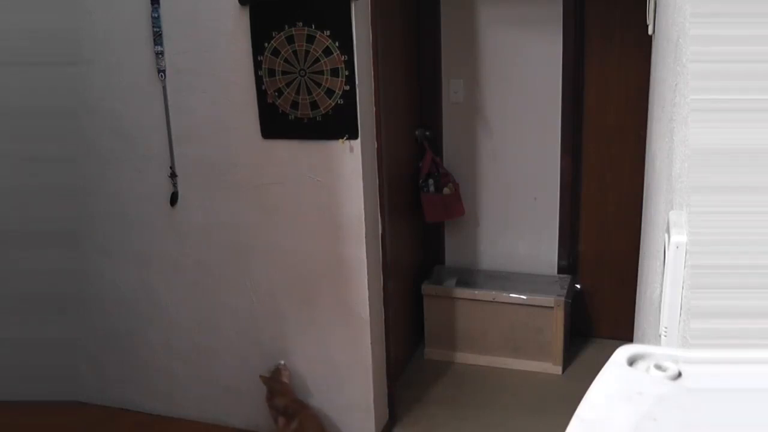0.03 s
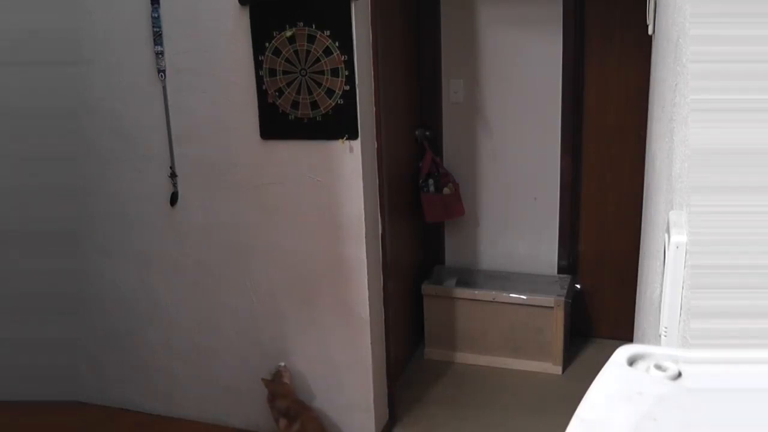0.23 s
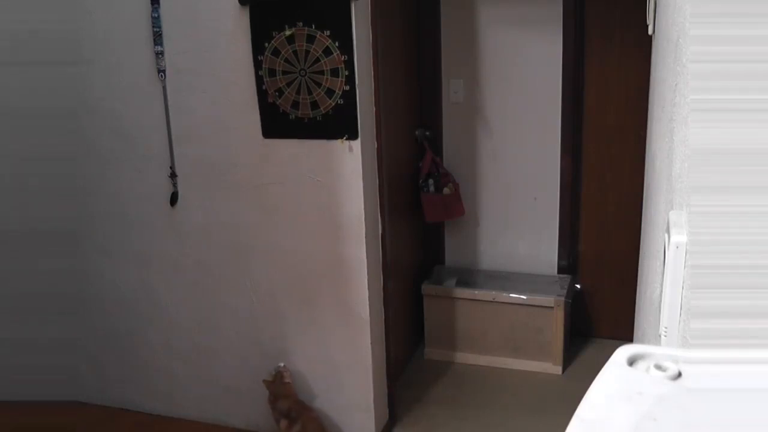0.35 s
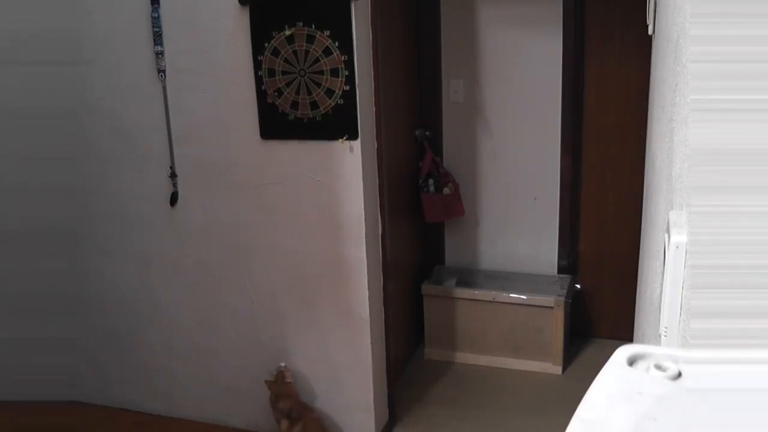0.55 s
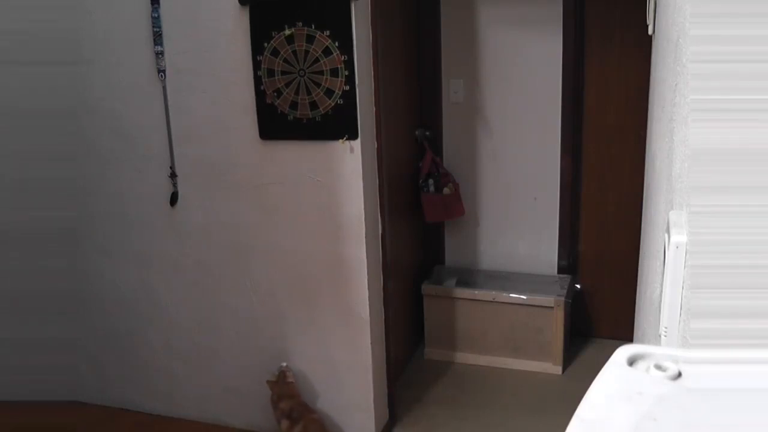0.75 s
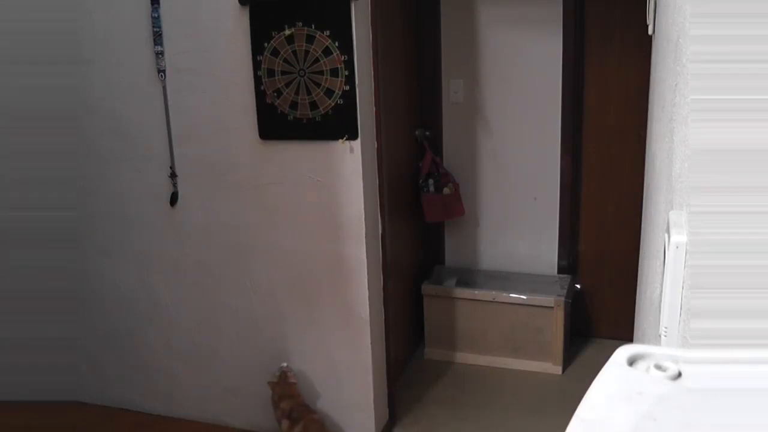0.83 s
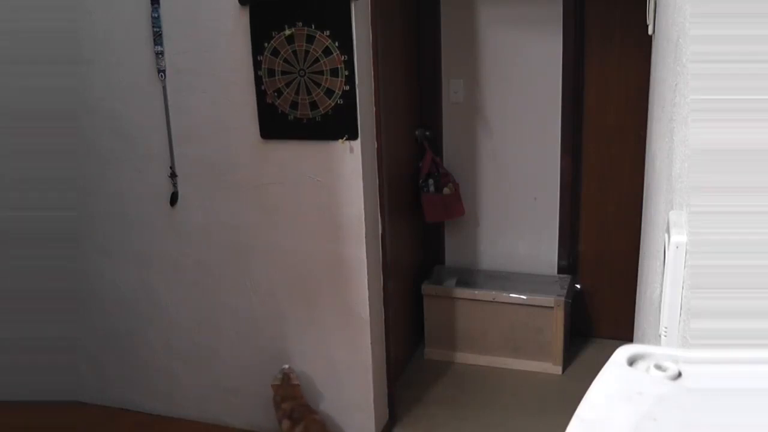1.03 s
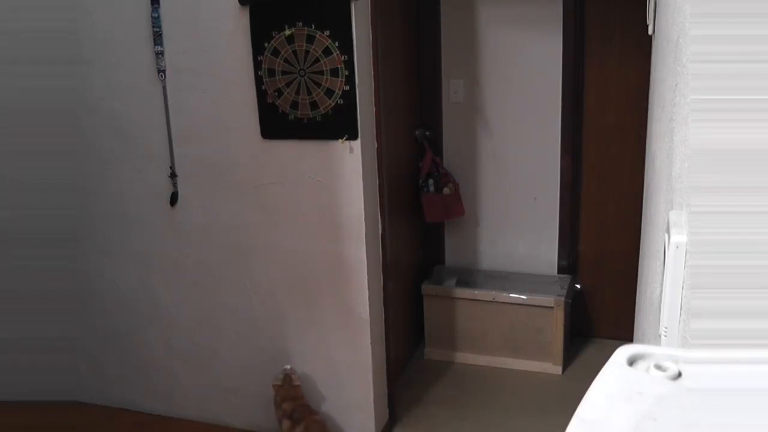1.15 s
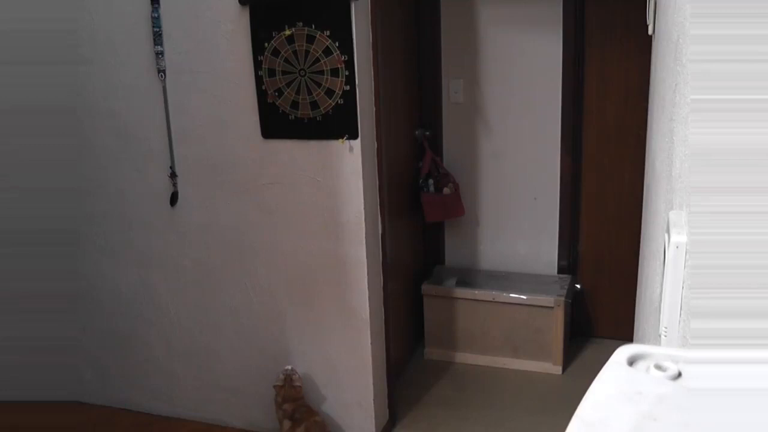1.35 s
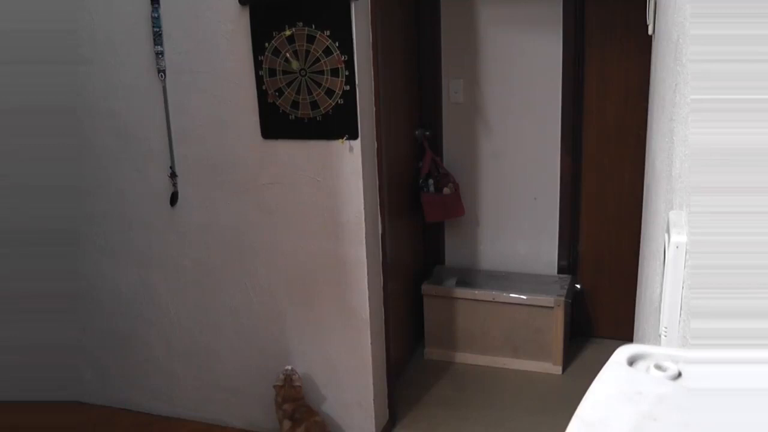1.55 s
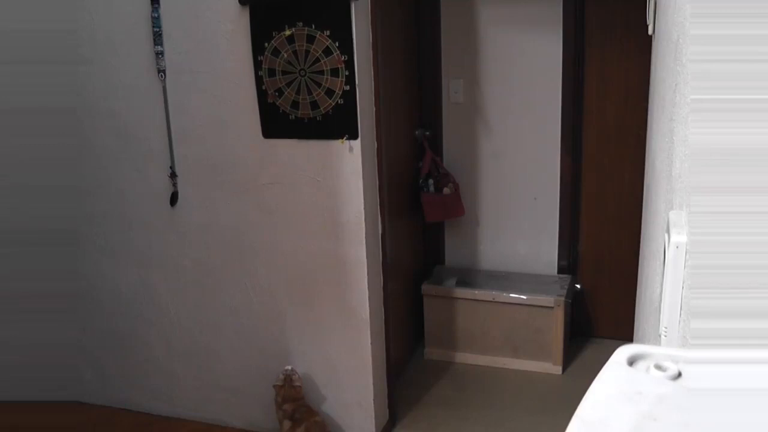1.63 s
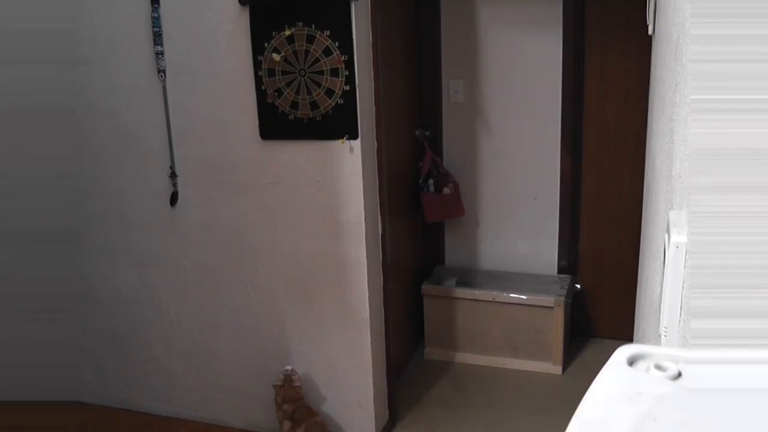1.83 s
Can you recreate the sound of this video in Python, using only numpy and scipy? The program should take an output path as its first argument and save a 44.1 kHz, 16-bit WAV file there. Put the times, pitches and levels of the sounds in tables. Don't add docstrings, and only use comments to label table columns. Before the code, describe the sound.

Two magnetic darts clack hard against a hanging board in a quiet room, cloth rustling faintly

```python
import sys
import numpy as np
from scipy import signal
from scipy.fft import rfft, irfft, next_fast_len
from scipy.io import wavfile
from scipy.ndimage import uniform_filter1d

SR = 44100
rng = np.random.default_rng(int(sys.argv[2]) if len(sys.argv) > 2 else 0)


def attenuation_scalar(level_db):
    decades = np.asarray(level_db, float) / 20
    return 10 ** decades


def file_out(sig):
    cols = np.atleast_2d(sig).T
    lim = np.clip(cols, -1, 1)
    pcm = np.round(lim * 32767).astype(np.int16)
    wavfile.write(sys.argv[1], SR, pcm)


N = 83790
HALF_OCTAVES = 30 * 2 ** np.arange(0, 9.5, .5)


def unit(x):
    return x / np.sqrt(np.mean(x ** 2))


def pan(db):
    return attenuation_scalar(np.array([[db], [-db]]) / 2)


def decay(t, t60):
    return np.exp(-np.log(1000) * np.maximum(t, 0) / max(t60, 1e-4))


def ring(hz, t60, t, wave=np.sin):
    phase = 2 * np.pi * hz * np.maximum(t, 0)
    return (t > 0) * wave(phase) * decay(t, t60)


def band(hz, size):
    f = np.fft.rfftfreq(size, 1 / SR) + 1
    octaves = np.log2(f / hz)
    shape = np.exp(-(octaves * 2) ** 2 * 2)
    return unit(irfft(rfft(rng.standard_normal((2, size))) * shape, size))


def on_log(table, hz, col):
    table = np.array(table, float)
    return np.interp(np.log(hz), np.log(table[:, 0]), table[:, col])


def walk(rate):
    k = int(SR / rate)
    held = np.repeat(rng.standard_normal(N // k + 1), k)
    slewed = uniform_filter1d(uniform_filter1d(held, k), k)
    return 1.01 * slewed[:N]


def stereo(pair, side_db):
    return pair[0] + attenuation_scalar(side_db) * pair[1] * np.array([[1], [-1]])


# f/Hz, level/dB per Hz
RUMBLE = [(25, -22), (60, -10), (130, -5), (300, -3), (600, -10), (1500, -18), (4000, -30), (15000, -40)]
# f/Hz, level/dB
HUM = [(104, -63), (153, -62.5), (258, -72)]


def air(t):
    rumble = 0
    for hz in HALF_OCTAVES:
        bandwidth_db = 10 * np.log10(hz)
        db = on_log(RUMBLE, hz, col=1) + bandwidth_db + 0.55 * walk(2.83)
        rumble = rumble + attenuation_scalar(db) * stereo(band(hz, size=N), -2)
    hum = sum(attenuation_scalar(db + walk(6.8)) * np.sin(2 * np.pi * hz * t) for hz, db in HUM)
    return unit(rumble) * attenuation_scalar(-51.5) + hum


# t/s, level/dB
MOVEMENT = [(0, -40.5), (.1, -48), (.18, -47.5), (.27, -45.5), (0.369, -41), (.43, -45.5), (.6, -52.5),
            (.75, -48), (.8, -43), (.9, -44), (.99, -40.5), (1.1, -45), (1.27, -50), (1.36, -42.5),
            (1.47, -46.5), (1.62, -50), (1.75, -46), (1.9, -47.5)]
# f/Hz, level/dB per Hz
CLOTH = [(500, -5), (1000, -4.5), (2000, 2), (2600, 0.5), (3400, 1), (6000, 2), (11000, -2), (16000, -8)]


def sleeve(t):
    rustle = 0
    shared_flicker = walk(12.94)
    grain = attenuation_scalar(1.5 * walk(300))
    for hz in HALF_OCTAVES[7:]:
        bandwidth_db = 10 * np.log10(hz)
        flicker_db = 1.1 * shared_flicker + .7 * walk(8.86)
        db = on_log(CLOTH, hz, col=1) + bandwidth_db + flicker_db
        rustle = rustle + attenuation_scalar(db) * stereo(band(hz, size=N), 0)
    move = np.array(MOVEMENT)
    move_db = np.interp(t, move[:, 0], move[:, 1])
    return unit(rustle * grain) * attenuation_scalar(1 + move_db)


# delay t/s, level/dB, left-right level/dB
ECHOES = [(.0045, -11, 0), (.0052, -7, -2), (.0066, -14, 2), (.0093, -13, 1)]
# f/Hz, level/dB, t60 t/s, sign, left-right level/dB
ROOM_MODES = [(340.7, -64, 0.58, 1, 9), (399, -62.5, 0.7, 1, 2), (422, -63, 0.57, -1, -2),
              (458, -59.5, 0.43, 1, -6), (496, -47.5, 0.2, -1, 3), (509.8, -53.5, 0.5, -1, 0),
              (531, -50.5, 0.37, -1, -1), (550.2, -57, 0.54, -1, 4), (579.2, -52.5, 0.21, -1, -7),
              (621.4, -50.5, 0.36, -1, 4), (680, -56, 0.26, -1, 5), (711, -57, .49, -1, -11),
              (779, -57.5, 0.36, 1, -3)]
# f/Hz, level/dB, t60 t/s, side re mid level/dB
TAIL = [(120, -57, .3, -3), (280, -50, .8, -8), (480, -63, .95, 4), (800, -55, .7, 1), (1400, -49, .55, 0),
        (3000, -48, .4, 2), (6000, -43, .22, 0), (13000, -43, .12, 0)]


def room(t):
    ir = np.zeros((2, N))
    for delay, db, pan_db in ECHOES:
        one_sample_pulse = np.maximum(1 - np.abs(t - delay) * SR, 0)
        ir += attenuation_scalar(db) * pan(pan_db) * one_sample_pulse
    ir = signal.lfilter(*signal.butter(1, 7000, fs=SR), ir)
    ir[:, 0] = 1
    tail_start_s, tail_rise_s, modes_start_s = .004, .002, .0006
    rise = 1 - np.exp(-np.maximum(t - tail_start_s, 0) / tail_rise_s)
    for hz, db, t60, sign, pan_db in ROOM_MODES:
        ir += rise * sign * attenuation_scalar(db) * pan(pan_db) * ring(hz, t60, t - modes_start_s)
    for hz in HALF_OCTAVES[2:]:
        fade_db = on_log(TAIL, hz, col=1) - 60 * t / on_log(TAIL, hz, col=2)
        fade = attenuation_scalar(fade_db) * np.sqrt(hz / 1000)
        ir += rise * fade * stereo(band(hz, size=N), on_log(TAIL, hz, col=3))
    return ir


# f/Hz, level/dB, t60 t/s
TICK = [(3400, 1, .0026), (6300, -7, .002), (11500, -13, .0015)]


def magnet_tick(u, noise):
    tick = np.zeros(N)
    for k, (hz, db, t60) in enumerate(TICK):
        tick -= (-1) ** k * attenuation_scalar(db) * ring(hz, t60, u)
    crack = attenuation_scalar(-23) * noise * (u > 0) * decay(u, .02)
    return tick + crack


# f/Hz, level/dB, t60 t/s, sign
THUMP = [(505, 0, .026, 1), (80, -21, .02, 1), (1380, -14, .011, -1), (1800, -15, .007, -1)]


def board_thump(u, over_hz, over_db):
    lag_s, contact_s, overtone_t60_s = .0004, .0002, .015
    thump = np.zeros(N)
    for hz, db, t60, sign in THUMP + [(over_hz, over_db, overtone_t60_s, -1)]:
        thump -= sign * attenuation_scalar(db) * ring(hz, t60, u - lag_s, np.cos)
    return uniform_filter1d(thump, size=int(contact_s * SR))


# t/s, level/dB, tick re thump level/dB, board overtone f/Hz, overtone re thump level/dB
DARTS = [
    (0.2102, -5, -7, 870, -11),
    (1.4856, -4.5, -6, 935, -8),
]


def darts(t):
    out = np.zeros(N)
    noise = np.diff(rng.standard_normal(N + 1))
    for at, db, tick_db, over_hz, over_db in DARTS:
        u = t - at
        tick = magnet_tick(u, noise)
        thump = board_thump(u, over_hz, over_db)
        out += attenuation_scalar(db) * (thump + attenuation_scalar(tick_db) * tick)
    return out


def scene():
    t = np.arange(N) / SR
    size = next_fast_len(2 * N)
    hits = irfft(rfft(darts(t), size) * rfft(room(t), size), size)[:, :N]
    return hits + sleeve(t) + air(t)


def band_limit(x):
    return signal.sosfilt(signal.butter(12, 16900, fs=SR, output="sos"), x)


# f/Hz, side re mid level/dB
PORTS = [(40, -1), (700, -2), (1500, -5), (2500, -11), (3500, -34), (8000, -34), (8500, -7), (9500, -9),
         (10500, -17), (16000, -24)]


def record(dry):
    mid = (dry[0] + dry[1]) / 2
    side = (dry[0] - dry[1]) / 2
    f = np.fft.rfftfreq(N, 1 / SR) + 1
    side = irfft(rfft(side) * attenuation_scalar(on_log(PORTS, f, col=1)), N)
    low_pass = signal.ellip(9, .3, 40, 15950, fs=SR, output="sos")
    mix = signal.sosfilt(low_pass, [mid + side, mid - side])
    return band_limit(mix)


dry = scene()
out = record(dry)
file_out(out)
```